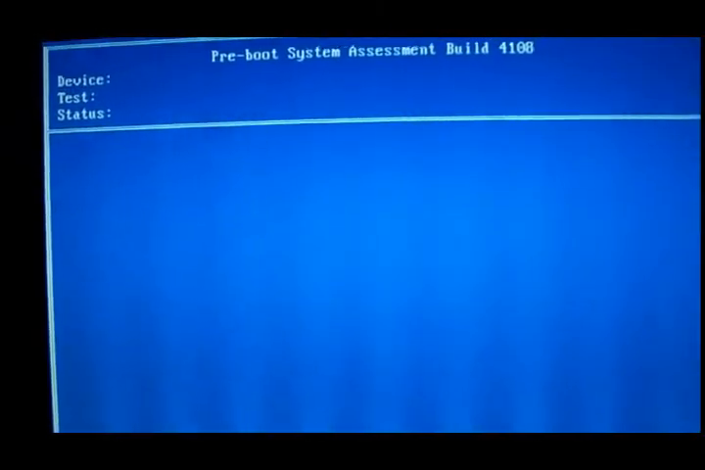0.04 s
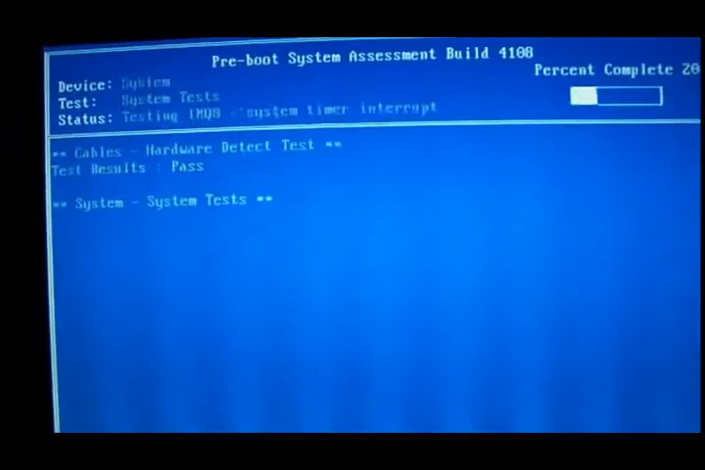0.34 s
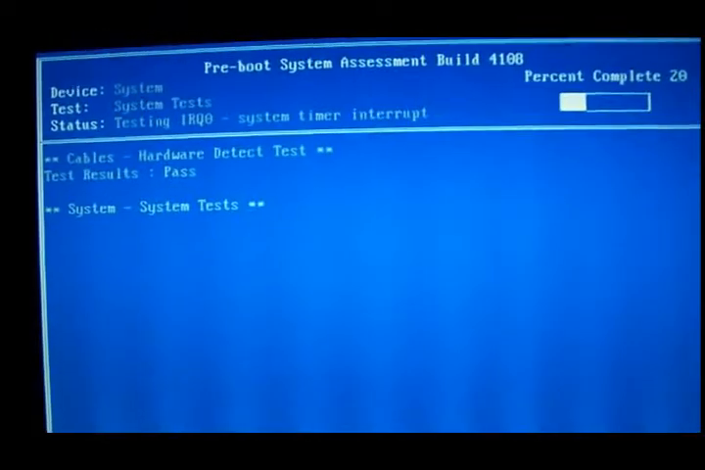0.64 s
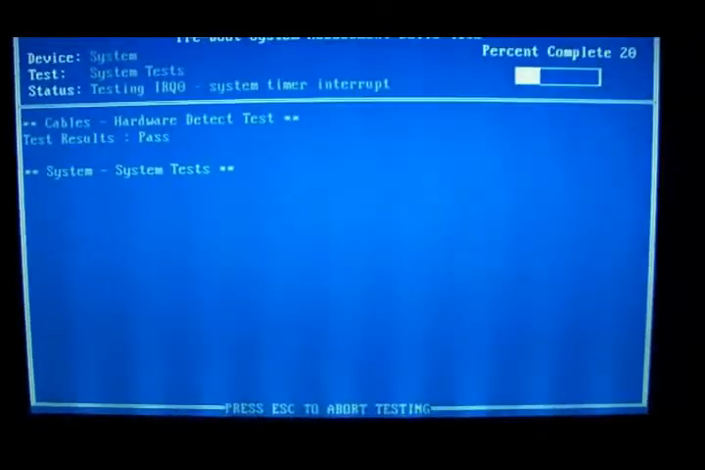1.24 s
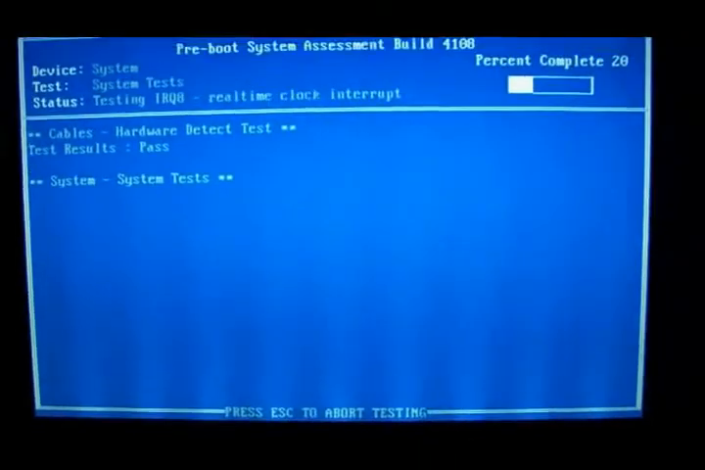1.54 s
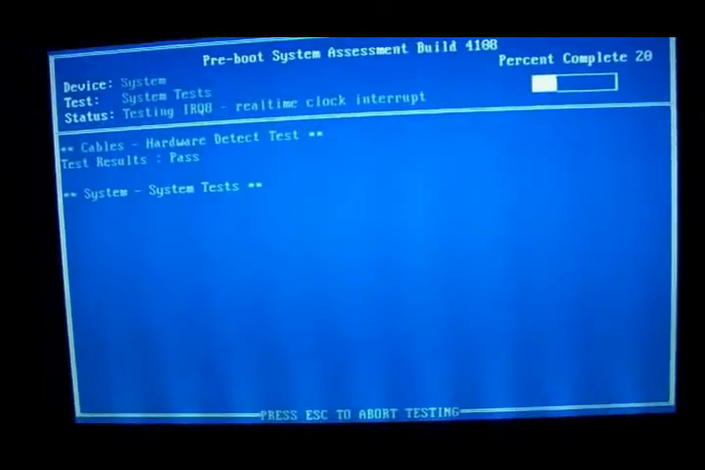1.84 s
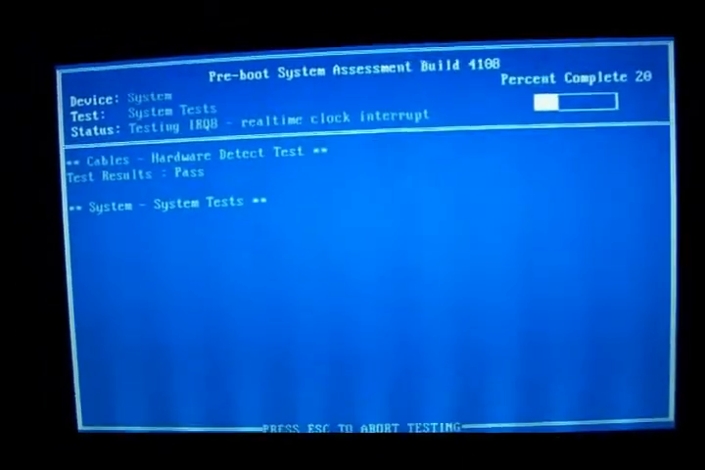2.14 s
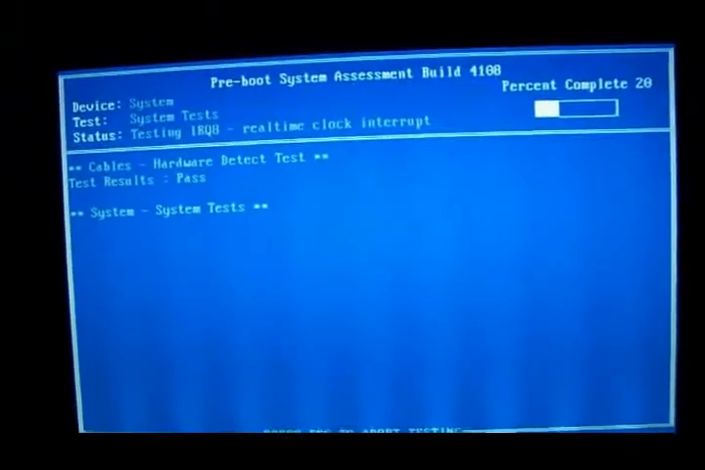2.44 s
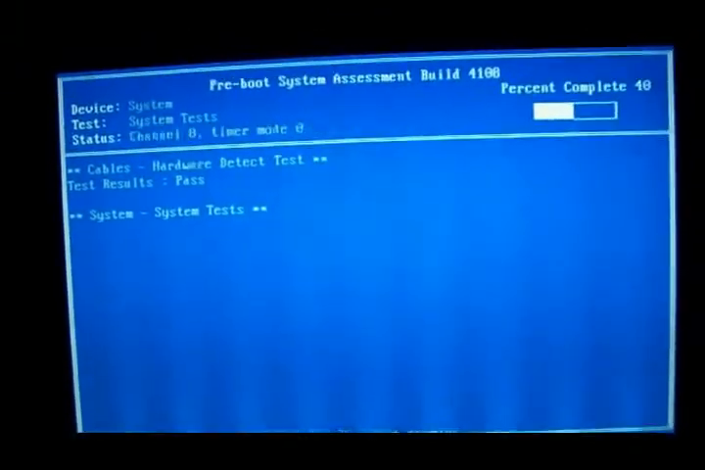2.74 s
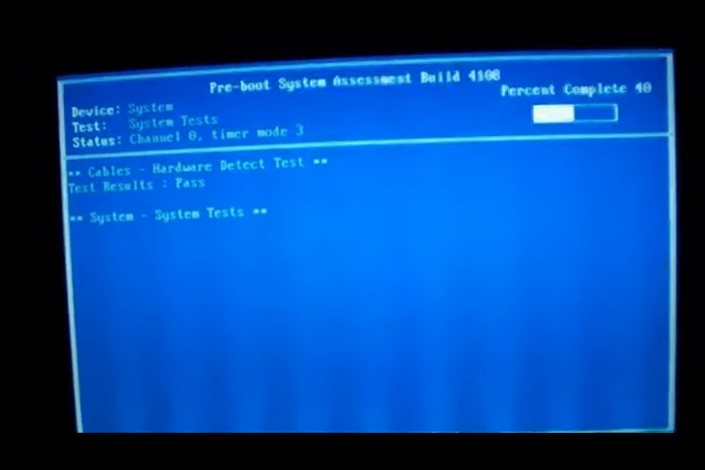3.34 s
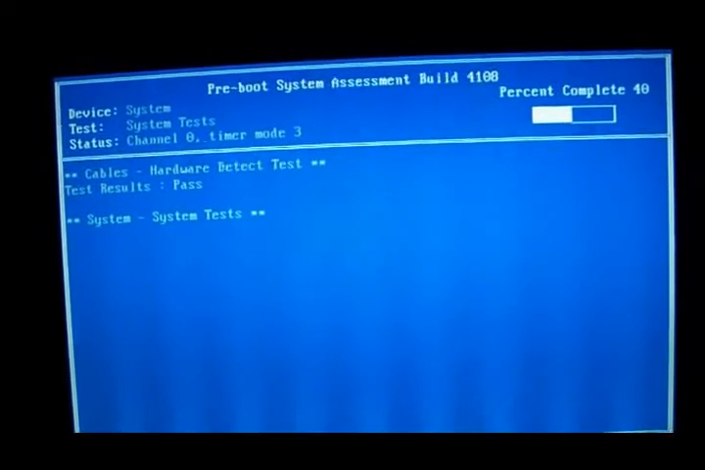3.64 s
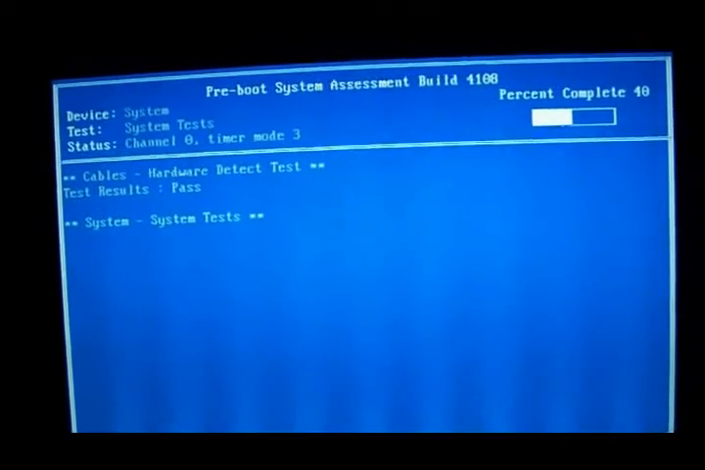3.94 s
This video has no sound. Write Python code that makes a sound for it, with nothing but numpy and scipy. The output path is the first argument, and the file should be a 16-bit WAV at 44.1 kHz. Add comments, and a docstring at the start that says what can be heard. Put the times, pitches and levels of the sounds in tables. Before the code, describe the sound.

Rapid, dull ticking of phone interference, above soft fan hiss and fingers scuffing plastic.

```python
"""A laptop fan hums and hisses in a quiet room, close to a hand-held phone.
Radio interference ticks in the phone's microphone circuit, in a stuttering burst ten times a second:
each packet is a voltage pulse that the circuit rounds into a tick.
Fingers slide and scuff over the phone's plastic case, which creaks and clicks."""
import sys
import numpy as np
from scipy.fft import rfft, irfft, next_fast_len
from scipy.io import wavfile
from scipy.ndimage import map_coordinates

SR = 44100
rng = np.random.default_rng(int(sys.argv[2]) if len(sys.argv) > 2 else 0)


def digitize_waveform(pressure):
    """Quantize a signal to 16-bit integers and store it at the path in sys.argv[1].

    Rows of a 2-D input are taken as channels; values are limited to [-1, 1].
    """
    field = np.atleast_2d(pressure).T
    bounded = np.clip(field, -1, 1)
    quanta = np.round(bounded * 32767).astype(np.int16)
    wavfile.write(sys.argv[1], SR, quanta)


N = 176400


def amp(db):
    return 10 ** (np.asarray(db) / 20)


def unit_rms(x):
    return x / np.sqrt(np.mean(x ** 2) + 1e-20)


def eq_gain(curve, hz):
    """Linear gain read from (Hz, dB) points on a log frequency axis."""
    points_hz, points_db = np.transpose(curve)
    return amp(np.interp(np.log(hz + 1), np.log(points_hz + 1), points_db))


def wobble(rate):
    """A smooth random curve, rate knots a second."""
    knots = rng.standard_normal(int(N * rate / SR) + 4)
    return map_coordinates(knots, [np.arange(N) * rate / SR])


def filtered(x, response):
    """Filter x by a complex response, given as a function of Hz."""
    size = next_fast_len(N + SR // 2)
    return irfft(rfft(x, size) * response(np.fft.rfftfreq(size, 1 / SR)), size)[:N]


def minimum_phase(gain):
    """A response with this gain and no pre-ringing."""
    cepstrum = irfft(np.log(np.maximum(gain, 1e-6)))
    half = len(cepstrum) // 2
    cepstrum[1:half] *= 2
    cepstrum[half + 1:] = 0
    return np.exp(rfft(cepstrum))


def noise(spectrum):
    """Coloured noise of rms 1."""
    return unit_rms(filtered(rng.standard_normal(N), lambda hz: eq_gain(spectrum, hz)))


def add(track, start_s, sound):
    part = track[max(round(start_s * SR), 0):][:len(sound)]
    part += sound[:len(part)]


def decay(t, t60):
    """A tail that falls 60 dB in t60 seconds."""
    return amp(-60 * t / t60)


# Colour of the fan's air and the room tone (frequency [Hz], relative level [dB])
AIR_SPECTRUM = [(25, -22), (60, -4), (130, -6.5), (270, -5), (520, -0.5), (720, -3), (1000, -4), (1500, -9),
                (2400, -15.5), (3400, -20.5), (5000, -26.5), (9000, -24.5), (15000, -24)]
# The fan's hum (frequency [Hz], rms level [dB])
FAN_TONES = [(545, -70.5), (1191, -72.5), (2382, -82)]


def fan():
    """The bed: rushing air under three faint tones that waver together with the fan's speed."""
    speed = 1 + 0.001 * wobble(5)
    phase_per_hz = 2 * np.pi * np.cumsum(speed) / SR
    hum = sum(amp(db + wobble(5)) * np.sqrt(2) * np.sin(hz * phase_per_hz) for hz, db in FAN_TONES)
    air_db = -57.5 + 0.5 * wobble(5.5)
    return hum + amp(air_db) * noise(AIR_SPECTRUM)


# Long radio packets: dull ticks, bunched every tenth of a second (time [s])
PACKET_STARTS = [0.031, 0.0428, 0.0646, 0.1276, 0.1492, 0.1629, 0.2419, 0.2475, 0.261, 0.264, 0.3302,
                 0.3432, 0.4086, 0.4277, 0.4617, 0.4727, 0.5451, 0.5496, 0.6272, 0.6311, 0.6622, 0.6734,
                 0.7485, 0.7532, 0.7642, 0.7671, 0.8466, 0.8619, 0.9306, 0.9435, 0.9737, 1.0271, 1.0458,
                 1.0616, 1.1306, 1.1422, 1.1476, 1.1521, 1.2459, 1.2572, 1.2648, 1.3267, 1.3466, 1.3613,
                 1.4294, 1.4419, 1.5273, 1.5314, 1.55, 1.5619, 1.6305, 1.641, 1.7276, 1.7315, 1.7582,
                 1.7622, 1.8272, 1.8312, 1.8634, 1.872, 1.9432, 1.9477, 2.0276, 2.0315, 2.062, 2.1282,
                 2.1508, 2.1623, 2.2419, 2.248, 2.2613, 2.2642, 2.3297, 2.3327, 2.3637, 2.4273, 2.4492,
                 2.463, 2.5409, 2.5456, 2.628, 2.6434, 2.6624, 2.6752, 2.7456, 2.7506, 2.7738, 2.7773,
                 2.8406, 2.861, 2.9266, 2.9303, 2.9634, 2.9664, 3.0408, 3.0612, 3.1403, 3.1461, 3.1748,
                 3.228, 3.2425, 3.2664, 3.3266, 3.3495, 3.4417, 3.4462, 3.5267, 3.5402, 3.5605, 3.5731,
                 3.6415, 3.6462, 3.7275, 3.7407, 3.7572, 3.7611, 3.8265, 3.8305, 3.8634, 3.9262, 3.9459,
                 3.9493]
# Short blips in the same bursts: lighter, brighter ticks (time [s])
BLIP_STARTS = [0.0284, 0.0475, 0.062, 0.1315, 0.1458, 0.1752, 0.2304, 0.252, 0.258, 0.2668, 0.3273, 0.3624,
               0.3736, 0.4412, 0.4444, 0.5271, 0.5295, 0.5613, 0.5639, 0.6433, 0.6465, 0.7293, 0.7438,
               0.7591, 0.7615, 0.8281, 0.8317, 0.8722, 0.9279, 0.9481, 0.9624, 1.0306, 1.0425, 1.0729,
               1.1279, 1.1542, 1.1623, 1.2291, 1.2317, 1.2424, 1.2616, 1.3307, 1.374, 1.4267, 1.461, 1.4636,
               1.5433, 1.5465, 1.5739, 1.627, 1.6613, 1.6638, 1.7436, 1.7471, 1.7739, 1.7759, 1.8437,
               1.8469, 1.9283, 1.9308, 1.9618, 1.9644, 2.0307, 2.0452, 2.0484, 2.1408, 2.1743, 2.2293,
               2.2528, 2.2582, 2.2671, 2.3269, 2.3431, 2.3611, 2.4412, 2.4459, 2.4718, 2.5278, 2.5608,
               2.5633, 2.6492, 2.6524, 2.7289, 2.7407, 2.76, 2.7626, 2.8267, 2.8301, 2.8722, 2.8743, 2.9606,
               3.0303, 3.0753, 3.1287, 3.1507, 3.1626, 3.1723, 3.2485, 3.2506, 3.2633, 3.3306, 3.3461,
               3.4268, 3.4293, 3.4605, 3.463, 3.546, 3.5492, 3.6272, 3.6298, 3.6505, 3.6605, 3.7463, 3.7495,
               3.7739, 3.776, 3.8413, 3.8608, 3.93, 3.9422, 3.961]


def radio_interference():
    """Each packet is a flat voltage pulse; the microphone circuit rounds it into a two-sided tick."""
    def pulses(starts, width_ms, level_db):
        train = np.zeros(N)
        pulse = np.clip(width_ms * SR / 1000 - np.arange(SR // 100), 0, 1)
        for start in starts:
            add(train, start, amp(level_db) * pulse)
        return train

    def circuit(hz):
        coupling_hz, bass_cut_hz, lowpass_hz, lowpass_q = 1458, 27, 410.4, 0.7
        coupling = 1j * hz / (1j * hz + coupling_hz)
        bass_cut = 1j * hz / (1j * hz + bass_cut_hz)
        lowpass = 1 / (1 + 1j * hz / lowpass_hz / lowpass_q - (hz / lowpass_hz) ** 2)
        return coupling * bass_cut * lowpass

    packets = pulses(PACKET_STARTS, width_ms=1.597, level_db=-15.5)
    blips = pulses(BLIP_STARTS, width_ms=0.26, level_db=-13)
    return filtered(packets + blips, circuit)


# Fader ride of the sliding fingers (time [s], level [dB])
SLIDE_LEVELS = [(0, -85), (.82, -90), (.86, -59.5), (.91, -91), (1.07, -72), (1.11, -59.5), (1.18, -55),
                (1.21, -71.5), (1.27, -56.5), (1.33, -53), (1.39, -50.5), (1.48, -57.5), (1.51, -79),
                (2.08, -81), (2.141, -57.5), (2.18, -86), (2.66, -67.5), (2.74, -58.5), (2.85, -77),
                (2.94, -59), (3.0, -81), (3.3, -92), (3.39, -56), (3.46, -68), (3.52, -85), (4, -88)]
# Colour of skin rubbing on plastic (frequency [Hz], relative level [dB])
SKIN_SPECTRUM = [(100, -11), (400, 1.5), (900, -4), (1600, 3), (2300, 0.5), (3200, -8), (5000, -14),
                 (6500, -12), (10000, -12), (12000, -27), (15000, -36)]


def finger_slides():
    """Skin slides on the case: a soft, uneven hiss, grainy with tiny catches."""
    catches_per_s, grain_db = 200, -3
    catches = (rng.random(N) < catches_per_s / SR) * rng.standard_normal(N)
    grains = unit_rms(filtered(catches, lambda hz: minimum_phase(eq_gain(SKIN_SPECTRUM, hz))))
    level_db = np.interp(np.arange(N) / SR, *np.transpose(SLIDE_LEVELS))
    flutter_db = 1.7 * wobble(43.8)
    return amp(level_db + flutter_db) * (noise(SKIN_SPECTRUM) + amp(grain_db) * grains)


# Fingertip scuff cues, before trim (time [s], body level [dB], treble level [dB])
SCUFF_CUES = [(1.196, -42.5, -61.5), (1.286, -45, -71), (1.298, -51, -64), (1.313, -39, -63),
              (1.323, -41, -61), (1.385, -40, -61), (1.403, -41, -62), (1.476, -33, -50.5),
              (1.5584, -33.5, -51), (1.599, -35.5, -53), (2.147, -42, -47.5), (2.220, -48, -61),
              (2.467, -42, -64), (2.802, -45, -75), (2.826, -44.5, -82), (2.883, -41, -75),
              (2.939, -40, -74), (3.4042, -34, -45.5), (3.4323, -36.5, -56), (3.4555, -42, -55),
              (3.483, -35, -56)]


def fingertip_scuffs():
    """A fingertip slips briefly: a fast-fading rasp with a midrange body and an airy top."""
    body_trim_db, treble_trim_db, attack_s = 0.5, 5.5, 0.0011
    body, treble, t = np.zeros(N), np.zeros(N), np.arange(SR // 10) / SR
    envelope = (1 - np.exp(-t / attack_s)) * decay(t, t60=0.021)
    for start, body_db, treble_db in SCUFF_CUES:
        add(body, start, amp(body_db + body_trim_db) * envelope)
        add(treble, start, amp(treble_db + treble_trim_db) * envelope)
    rasp = noise([(200, -6), (900, -5), (1600, 6), (2900, -7.5), (4500, -21)])
    hiss = noise([(3000, -28), (5000, -3), (6500, -5), (10000, -4.5), (13000, -17)])
    return body * rasp + treble * hiss


# Case click cues, before trim
# (time [s], body level [dB], body pitch [Hz], edge level [dB], snap level [dB])
CLICK_CUES = [(1.5562, -23, 1650, -58, -60), (1.7593, -32.5, 1130, -60, -65),
              (2.9216, -30, 1650, -37.5, -48), (3.016, -24.5, 1610, -63, -44),
              (3.2131, -26.5, 1270, -37, -49.5), (3.2568, -27.5, 1210, -39.5, -51),
              (3.3187, -24.5, 1810, -45, -51), (3.3614, -25, 1690, -51, -50.5),
              (3.5646, -24, 1800, -64, -32.5)]
# High case resonances that give a click its snap (frequency [Hz], relative level [dB])
SNAP_RESONANCES = [(5000, -8), (6600, -3.5), (9200, -3)]


def case_clicks():
    """The plastic case snaps, rings for a few milliseconds and rattles out."""
    body_trim_db, edge_trim_db, snap_trim_db, rattle_trim_db = 1, 4.5, 14, -10.5
    edge_hz, attack_s = 2860, 0.00014
    rings, rattle_envelope, t = np.zeros(N), np.zeros(N), np.arange(SR // 10) / SR
    attack = 1 - np.exp(-(t / attack_s) ** 2)

    def ring(hz, db, t60):
        return amp(db) * np.sin(2 * np.pi * hz * t) * attack * decay(t, t60)

    for start, body_db, body_hz, edge_db, snap_db in CLICK_CUES:
        *snap_detunes, edge_detune = 1 + 0.044 * rng.standard_normal(len(SNAP_RESONANCES) + 1)
        body = ring(body_hz, body_db + body_trim_db, t60=0.0079)
        edge = ring(edge_hz * edge_detune, edge_db + edge_trim_db, t60=0.0067)
        snap = sum(ring(hz * detune, snap_db + snap_trim_db + db, t60=0.0031)
                   for (hz, db), detune in zip(SNAP_RESONANCES, snap_detunes))
        add(rings, start, body - edge + snap)  # the edge is in opposite polarity
        add(rattle_envelope, start, amp(body_db + rattle_trim_db) * attack * decay(t, t60=0.03))
    rattle = noise([(150, -8), (500, 12), (1100, 1), (3000, -10.5),
                    (6000, -18), (10000, -22), (13000, -36)])
    return rings + rattle_envelope * rattle


def scene():
    """Mono mix: the fan bed, with interference and handling noise on top."""
    return (fan() + radio_interference() + finger_slides() + fingertip_scuffs() + case_clicks())[None]


# The phone's EQ, with deep notches near 4 and 8 kHz (frequency [Hz], gain [dB])
PHONE_EQ = [(3000, -0.5), (3800, -5.5), (4170, -13), (4500, -5.5), (5000, 2), (6500, 4.5), (7200, -8.5),
            (7700, -27), (8080, -33), (8500, -23), (9200, -12.5), (10000, -19), (11000, -32.5),
            (15000, -36.5)]


def record(dry):
    """The phone colours the treble and keeps nothing above its band limit."""
    top_hz = 15600
    return filtered(dry[0], lambda hz: minimum_phase(eq_gain(PHONE_EQ, hz)) * (hz < top_hz))[None]


dry = scene()
out = record(dry)
digitize_waveform(out)
```